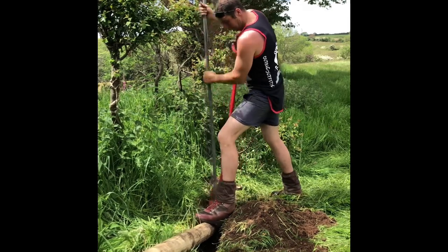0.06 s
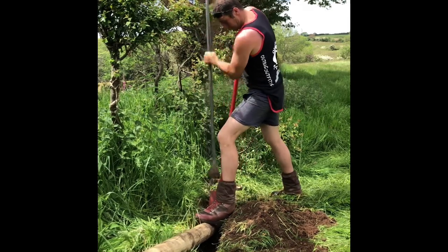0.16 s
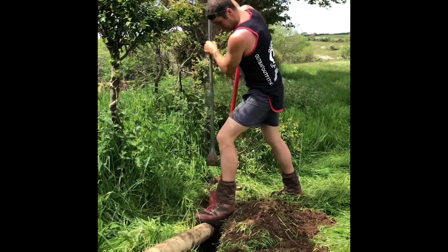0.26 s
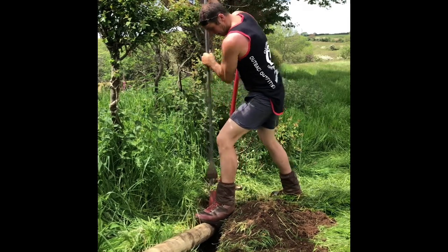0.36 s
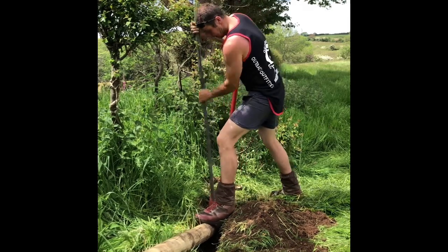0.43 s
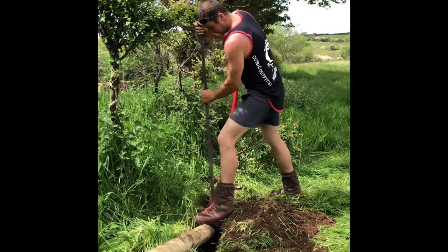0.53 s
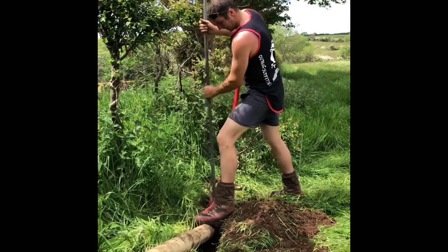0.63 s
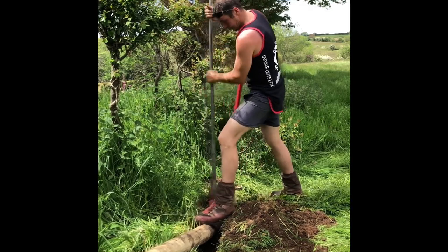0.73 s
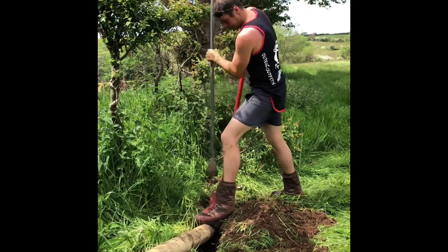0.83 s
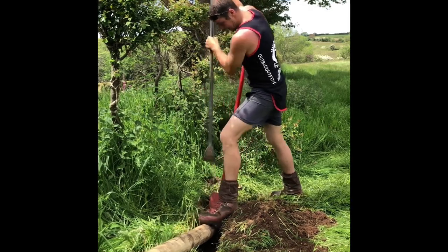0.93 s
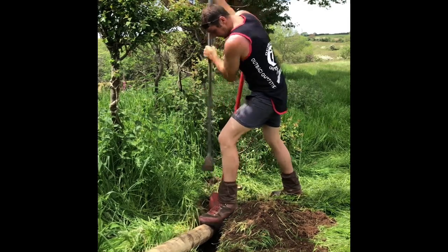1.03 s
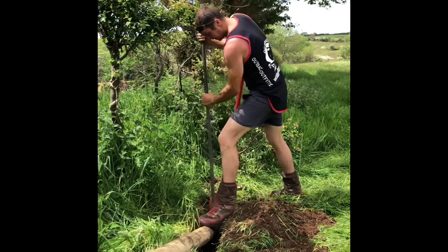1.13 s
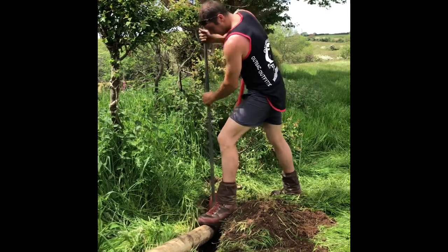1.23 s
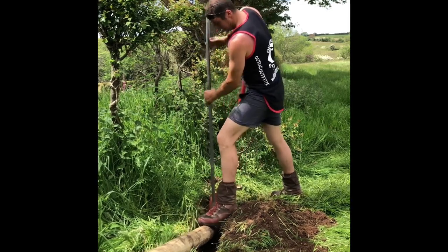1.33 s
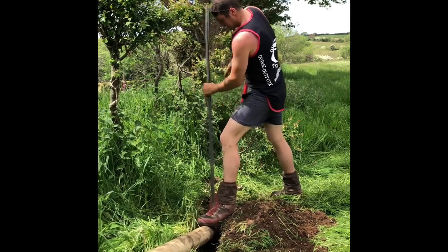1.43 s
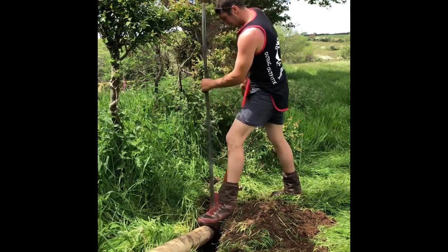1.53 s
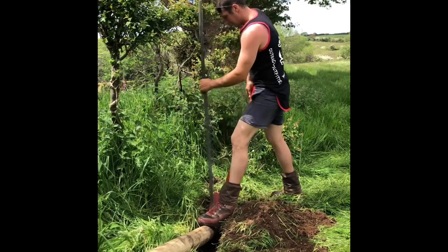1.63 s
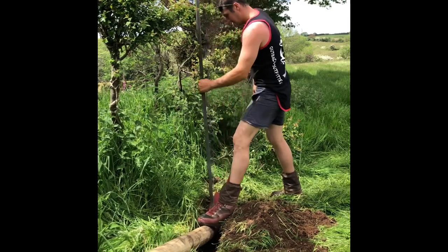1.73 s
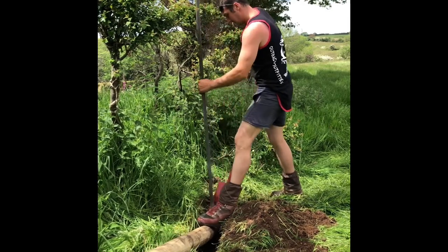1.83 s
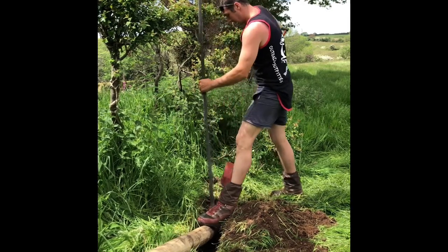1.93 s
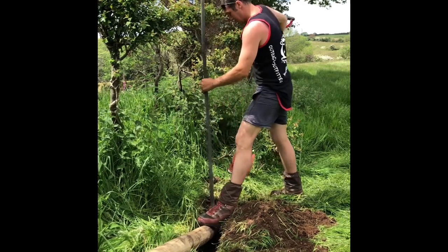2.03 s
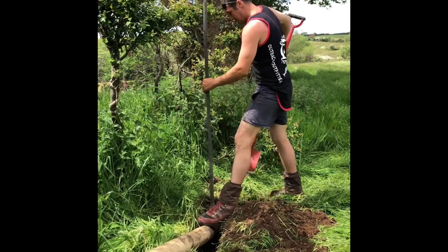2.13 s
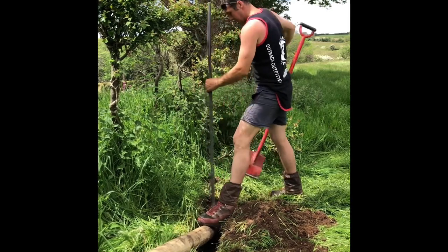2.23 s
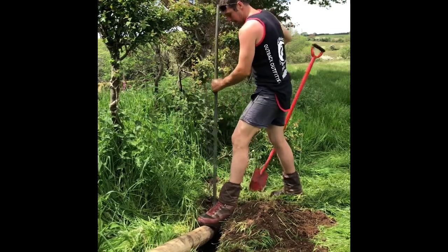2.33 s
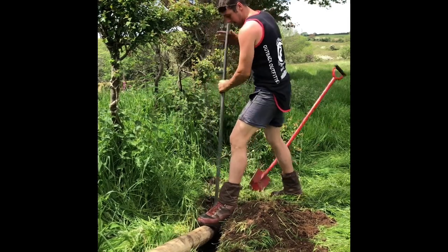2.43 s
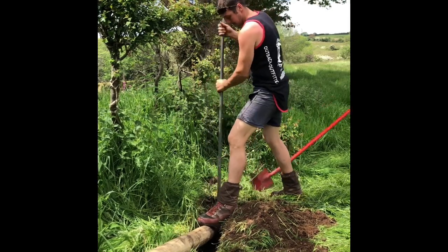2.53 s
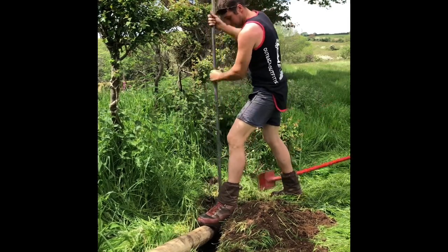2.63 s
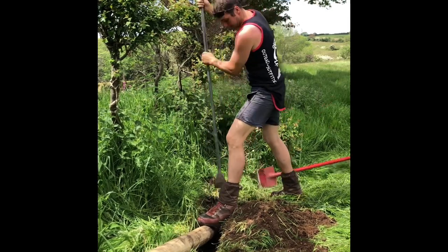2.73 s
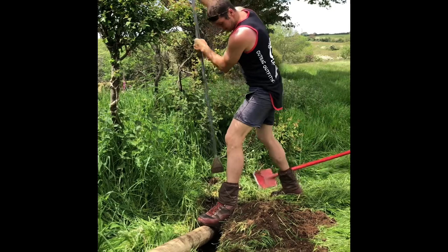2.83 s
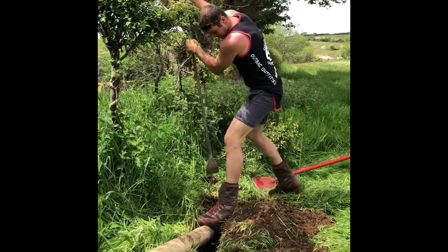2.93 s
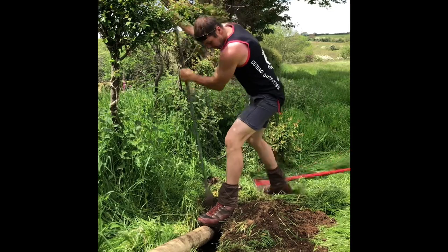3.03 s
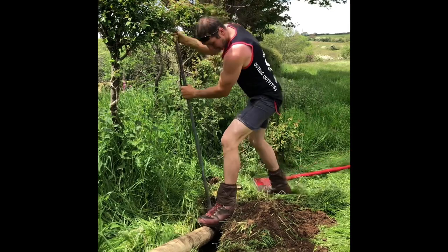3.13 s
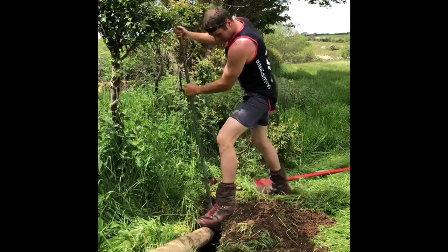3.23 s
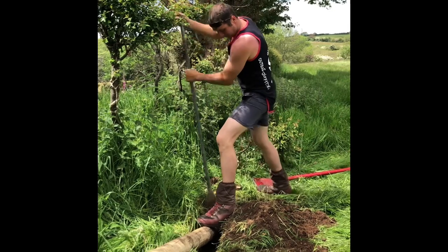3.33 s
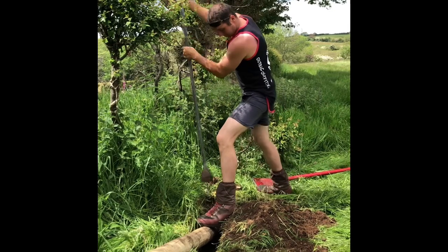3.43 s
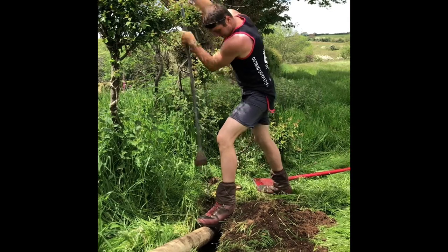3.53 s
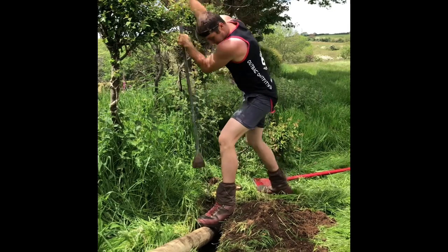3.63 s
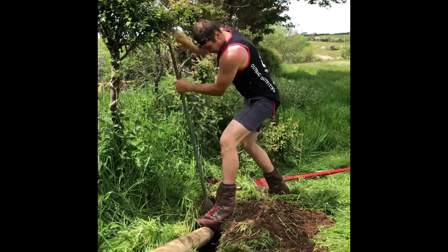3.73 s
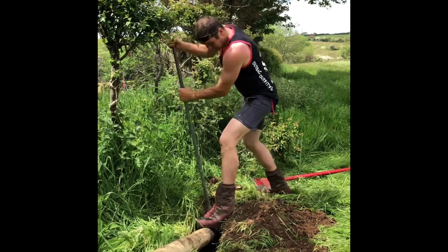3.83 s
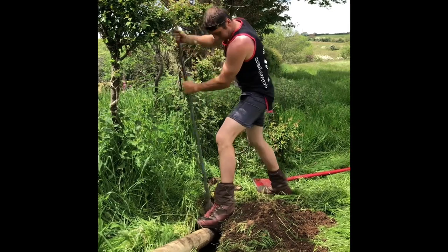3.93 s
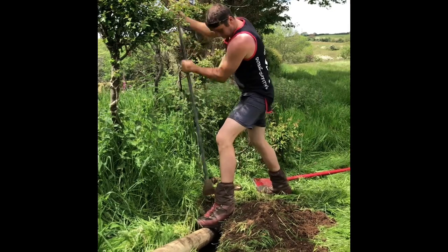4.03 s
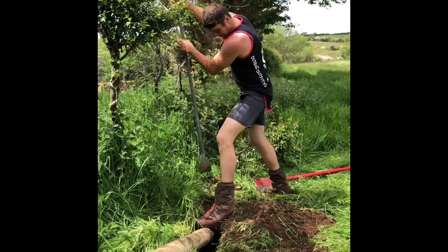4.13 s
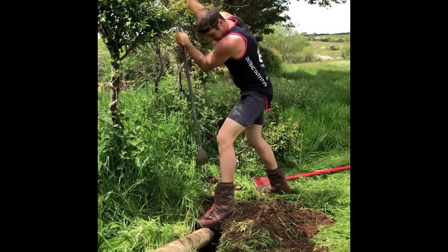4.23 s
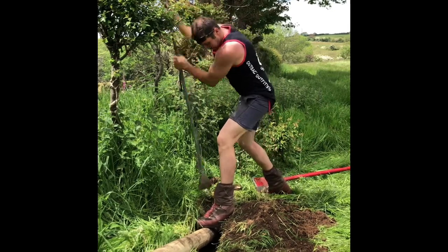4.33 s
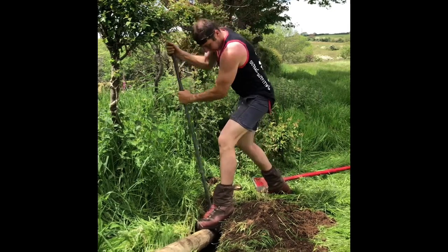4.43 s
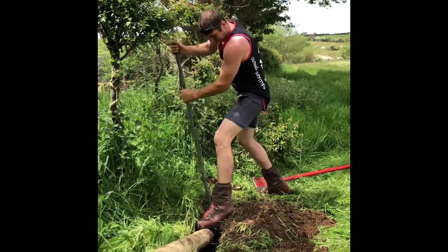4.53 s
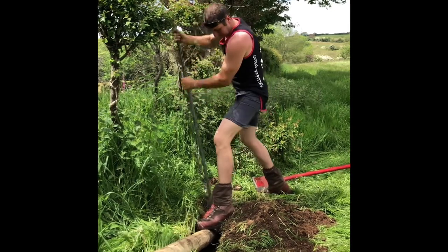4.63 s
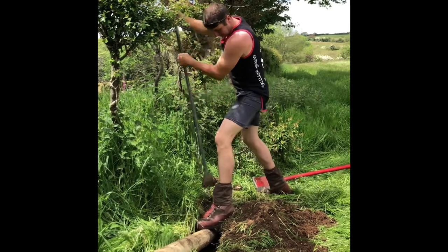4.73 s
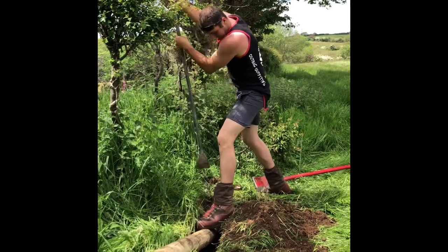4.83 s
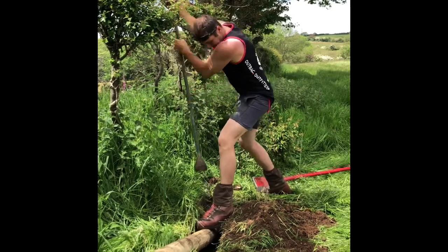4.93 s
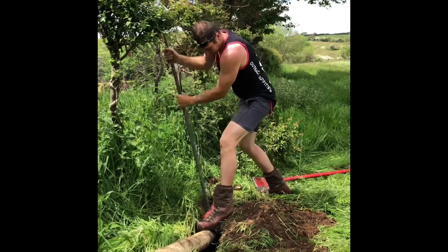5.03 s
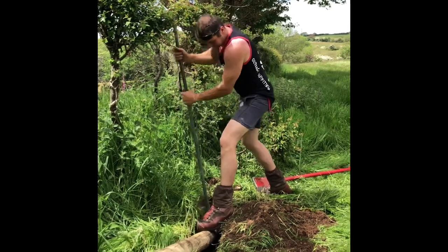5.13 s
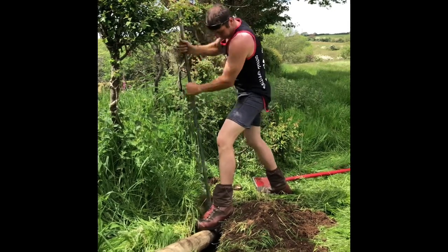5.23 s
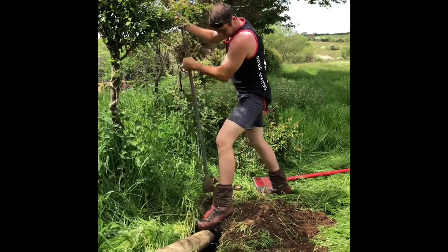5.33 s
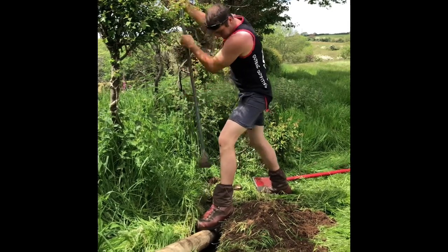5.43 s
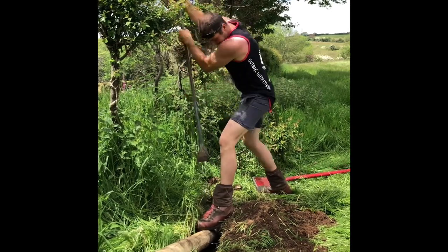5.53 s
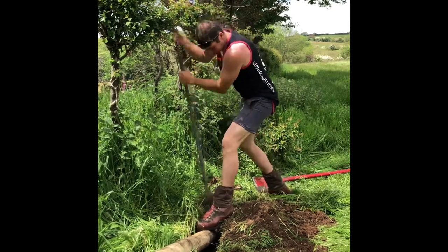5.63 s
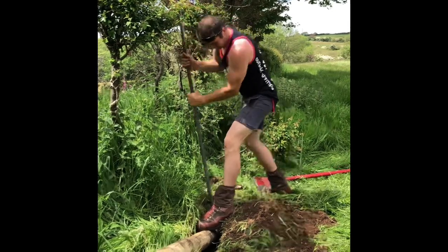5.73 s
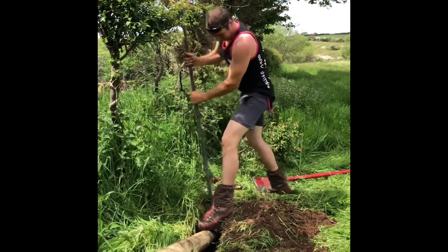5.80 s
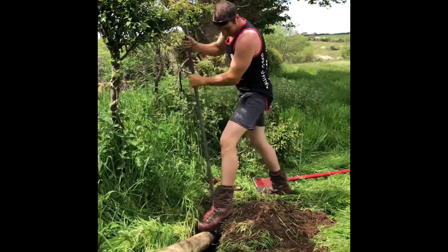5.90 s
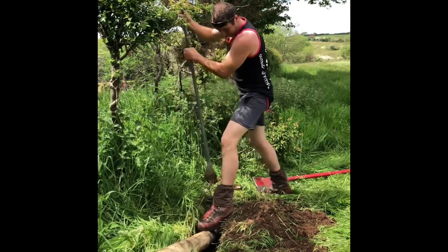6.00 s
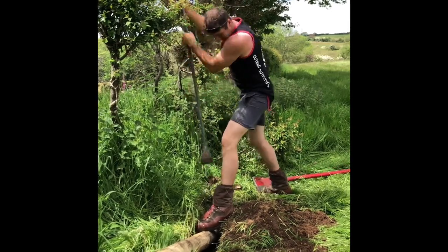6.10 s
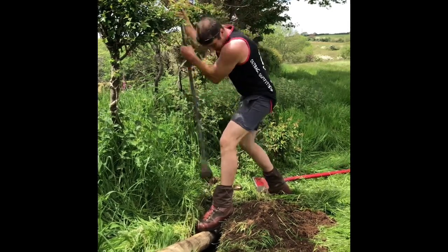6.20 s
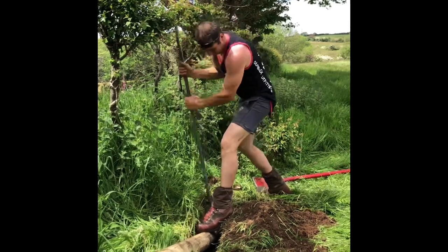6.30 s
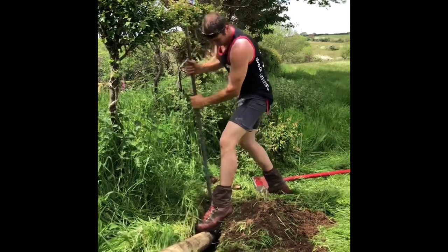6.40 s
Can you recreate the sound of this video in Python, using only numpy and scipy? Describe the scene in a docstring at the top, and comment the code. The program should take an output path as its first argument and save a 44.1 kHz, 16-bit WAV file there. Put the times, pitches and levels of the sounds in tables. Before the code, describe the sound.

Close, sharp knocks of a steel rammer on timber outdoors: two blows, a shovel's soft thud, then six more at a steady pace.

```python
"""A steel rammer bar, close to the microphone, strikes the foot of a wooden fence strut eight times.
Each blow cracks, sends a falling bending wave through the timber, thumps the ground and shakes soil
loose; the steel zings on the blow and tinkles as it is lifted. In the pause a shovel drops into the
grass. The place is a quiet paddock with a light breeze and an engine idling far off.
Heard in mono, through the nearby microphone's limiter, which squashes every blow."""
import sys
import numpy as np
from scipy import signal
from scipy.fft import rfft, irfft, next_fast_len
from scipy.io import wavfile
from scipy.ndimage import uniform_filter1d, minimum_filter1d, map_coordinates

SR = 44100
rng = np.random.default_rng(int(sys.argv[2]) if len(sys.argv) > 2 else 0)


def output_pcm(signal):
    """Save a mono or channel-first signal as 16-bit PCM at the path in sys.argv[1].

    Samples are clipped to [-1, 1] before scaling.
    """
    pcm = np.clip(np.atleast_2d(signal).T, -1, 1) * 32767
    wavfile.write(sys.argv[1], SR, np.round(pcm).astype(np.int16))


N = 284886
AGE = np.arange(SR // 2) / SR  # time since a contact [s]


def amp(db):
    """Decibels to gain."""
    return 10 ** (np.asarray(db) / 20)

def unit(x):
    """Scale to rms 1."""
    return x / np.sqrt(np.mean(x ** 2) + 1e-20)

def along(points, hz):
    """Read (frequency, value) points on a log axis."""
    f, v = np.transpose(points)
    return np.interp(np.log(hz + 1), np.log(f + 1), v)

def noise(spectrum, size=len(AGE)):
    """Coloured noise of rms 1."""
    m = next_fast_len(size)
    gain = amp(along(spectrum, np.fft.rfftfreq(m, 1 / SR)))
    return unit(irfft(rfft(rng.standard_normal(m)) * gain, m)[:size])

def crumbs(spectrum, clump_db):
    """Noise broken into millisecond grains."""
    grains = map_coordinates(rng.standard_normal(len(AGE)), [AGE * 900], order=1)
    return unit(noise(spectrum) * amp(clump_db * grains))

def resonance(hz, width_hz):
    """An unsteady ring: noise in one narrow band."""
    f = np.fft.rfftfreq(len(AGE), 1 / SR)
    return unit(irfft(rfft(rng.standard_normal(len(AGE))) / (1 + ((f - hz) / width_hz) ** 2), len(AGE)))

def tone(hz):
    """A sine that follows a pitch curve."""
    return np.sin(2 * np.pi * np.cumsum(hz) / SR)

def wobble(per_s):
    """A smooth random curve."""
    return map_coordinates(rng.standard_normal(N // 100), [np.arange(N) / SR * per_s])

def fade(delay, rise, t60):
    """Envelope that waits, rises and dies away; times in seconds."""
    t = np.maximum(AGE - delay, 0)
    return (1 - np.exp(-(t / rise) ** 2)) * 1000 ** (-t / t60)

def add(track, s, sound):
    """Mix a sound into the track at time s."""
    part = track[round(s * SR):][:len(sound)]
    part += sound[:len(part)]


# open-air rumble and leaf hush: (frequency [Hz], level [dB])
RUMBLE = [(12, -47), (25, -20), (40, -19), (60, -4.5), (92, -0.5), (120, -2), (160, -0.5), (216, -11),
          (290, -15.5), (400, -18.5), (520, -48.5), (880, -120)]
LEAVES = [(150, -27.5), (278, -21.5), (380, -17.5), (500, -15), (800, -12), (1500, -14.5), (2200, -16.5),
          (3120, -21), (3910, -20), (4730, -24), (16000, -45.5)]

def breeze():
    """A low rumble lies over the paddock, with a fluttering hush of leaves."""
    return amp(-53) * noise(RUMBLE, N) + amp(-57 + 1.2 * wobble(per_s=5)) * noise(LEAVES, N)


# course of the idle: (time [s], firing rate [1/s], clatter level [dB], hum level [dB])
IDLE = [(0, 27.626, -5.5, -10.5), (0.399, 27.854, -11, -18), (0.9, 29.06, -12, -23),
        (1.801, 27.95, -14, -23), (2.7, 27.61, -9.5, -15.5), (4.2, 26.95, -8.5, -16.5),
        (4.85, 26.96, -10, -6.5), (5.5, 27.4, -9.5, -8), (6.46, 27.78, -13, -20.5)]
# exhaust partials: (multiple of the firing rate, level [dB])
EXHAUST = [(1, -24), (2, 1), (3, 1), (4, -9.5), (5, -10), (5.5, -10), (6.5, -17.5), (7, -18.5)]
# engine clatter from afar: (frequency [Hz], level [dB])
CLATTER = [(600, -25), (1500, 0), (1900, 5.5), (2400, -0.5), (3100, -5), (3900, 1), (4800, -11.5),
           (5800, -13.5), (6900, -11.5), (8000, -25), (10000, -14.5), (12000, -35), (16000, -37)]

def distant_engine():
    """Far off, an engine idles: exhaust drone, a hum that comes and goes, clatter at every firing."""
    s, rate, clatter_db, hum_db = np.transpose(IDLE)
    t = np.arange(N) / SR
    firings = np.cumsum(np.interp(t, s, rate)) / SR
    drone = sum(amp(db + 4.5 * wobble(4.3)) * np.sin(2 * np.pi * (k * firings + rng.random()))
                for k, db in EXHAUST)
    hum = amp(np.interp(t, s, hum_db) + 1.86 * wobble(10)) * np.sin(2 * np.pi * 10 * firings)
    cycle = (firings + 0.08 * wobble(rate.mean())) % 1
    bursts = np.exp(-((cycle - 0.5) / 0.3) ** 2) * amp(2.5 * wobble(rate.mean()))
    clatter = unit(bursts * noise(CLATTER, N)) * amp(np.interp(t, s, clatter_db))
    # a narrow resonance in the clatter
    whine = unit(bursts * amp(2.5 * wobble(3.7)) * tone(2290 + 110 * wobble(200)))
    return amp(-51) * (drone + hum) + amp(-50) * clatter + amp(-69) * whine


# stalks underfoot: (time [s], level [dB])
STALK_TICKS = [(0.11, -54), (0.2628, -53), (1.603, -46)]
# one tick: (frequency [Hz], level [dB])
STALK = [(300, -17), (1000, 1), (2000, 3), (4500, -16), (8000, -27.5), (16000, -32.5)]

def stalks():
    """Stalks tick faintly underfoot."""
    out = np.zeros(N)
    for s, db in STALK_TICKS:
        add(out, s, amp(db) * crumbs(STALK, clump_db=4) * fade(0, 0.003, 0.25))
    return out


# brushed grass blades: (frequency [Hz], level [dB])
BLADES = [(300, -14.5), (700, 7.5), (1500, 1.5), (3000, -2.5), (6000, -19), (10000, -26), (16000, -25)]

def swing():
    """Ahead of each blow, grass rustles ever louder as the bar comes down through it."""
    out = np.zeros(N)
    lead = AGE[:round(0.4 * SR)]
    swell = np.exp((lead - lead[-1]) / 0.11)
    for s, *_, swing_db in BLOWS:
        rustle = crumbs(BLADES, clump_db=3)[:len(lead)] * swell
        add(out, s - lead[-1], amp(swing_db - 49.5) * rustle)
    return out


# gritty soil: (frequency [Hz], level [dB])
SOIL = [(200, 1), (700, 12), (1500, 8), (2500, -2), (4000, -3), (5500, -8.5), (8000, -10.5), (10000, -9.5),
        (12000, -18), (16000, -21)]

def lead_in():
    """A faint gritty rustle just before each blow."""
    return crumbs(SOIL, clump_db=4) * fade(0, 0.004, 0.19)


# the crack and its splintery top, close up: (frequency [Hz], level [dB])
CRACK = [(150, -20.5), (500, -1.5), (950, 7.5), (1400, 3.5), (2200, -4), (3700, -17), (6000, -14),
         (10000, -41.5), (16000, -34)]
SPLINTER = [(1000, -25), (3000, 11), (6000, 0.5), (10000, -0.5), (16000, -17.5)]

def impact(crack_db, bright_db):
    """Steel meets wood: a crack, a knock, a bending wave and a splintery edge."""
    crack = amp(crack_db - 4) * noise(CRACK) * fade(0, 0.0011, 0.045)
    knock = amp(-0.5) * np.sin(2 * np.pi * 935 * AGE) * fade(0, 0.0015, 0.031)
    wave = amp(6.5) * bending_wave(start_hz=1092, end_hz=215)
    splinter = amp(bright_db - 11.5) * crumbs(SPLINTER, clump_db=2.5) * fade(0.0049, 0.00075, 0.029)
    return crack + knock + wave + splinter

def bending_wave(start_hz, end_hz):
    """Short bending waves outrun long ones, so the pulse arrives as a brief falling chirp."""
    t = np.maximum(AGE - 0.00432, 0)
    glide_s = 0.00359 * rng.uniform(0.9, 1.117)
    hz = end_hz + (start_hz - end_hz) * np.exp(-(t / glide_s) ** 2)
    return tone(hz * (t > 0)) * (1 - np.exp(-(t / 0.0014) ** 2)) * np.exp(-(t / 0.0066) ** 2)


# modes of strut and bar in contact: (frequency [Hz], level [dB], t60 before choking [s])
STRUT_MODES = [(62, -16.5, 0.083), (100.3, -10, 0.36), (169.7, -15.5, 0.28), (217.8, 6.5, 0.14),
               (337.7, -10.5, 0.18), (358.2, -0.5, 0.16), (502.3, -2, 0.11), (544, -9.5, 0.15),
               (658, -14, 0.19), (690, -8.5, 0.15), (799, -16.5, 0.34), (960, -16, 0.25), (1060, -32, 0.36),
               (1137, -7.5, 0.028), (1264, -23.5, 0.081), (1481, -23.5, 0.41), (1965, -1.5, 0.036),
               (2527, -1, 0.023), (2672, 1, 0.021), (3030, -11, 0.033), (3470, -15, 0.023),
               (4090, -16, 0.012), (4390, -9, 0.024), (5270, -26.5, 0.038)]
# the strut's many weak, crowded modes: (frequency [Hz], level [dB])
CROWDED_MODES = [(150, -13), (300, -0.5), (450, 1.5), (950, 2.5), (1150, 0.5), (1550, -5.5), (2100, -15),
                 (3000, -21.5), (6000, -34.5), (16000, -58)]

def strut_ring(timber, crack_db, ring_db, bright_db, pitch):
    """The strut rings a little differently each time, until the bar's weight settles and chokes it."""
    hz, db, t60 = np.transpose(STRUT_MODES)[:, :, None]
    scatter, detune = rng.standard_normal((2, len(STRUT_MODES), 1))
    delay = 0.00465 * np.maximum(np.sqrt(1000 / hz) - 0.7, 0)  # low modes arrive last
    rise = 0.0011 + 1.44 / hz  # and swell slowest
    blow_db = np.where(hz > 1800, crack_db + 2, ring_db) + bright_db * (hz > 3200)
    level = amp(db - 4.5 + 1.5 * scatter + blow_db)
    sines = np.sin(2 * np.pi * hz * pitch * (1 + 0.008 * detune) * (AGE - delay))
    modes = np.sum(level * sines * fade(delay, rise, t60), axis=0)
    body = amp(ring_db - 19.5) * timber * fade(0.0095, 0.0038, 0.14)
    choke = np.exp(-(AGE / 0.1) ** 3)
    return (modes + body) * choke

def loose_soil():
    """Soil shakes loose, then the bar beds into the grit."""
    spill = amp(-22) * crumbs(SOIL, clump_db=-0.5) * fade(0.019, 0.0029, 0.17)
    grind = amp(-30) * crumbs(SOIL, clump_db=3) * fade(0.051, 0.0016, 0.14)
    return spill + grind

def thump(start_hz, end_hz, delay, rise, t60):
    """Soft earth gives way under a weight, its pitch sagging."""
    t = np.maximum(AGE - delay, 0)
    hz = end_hz + (start_hz - end_hz) * np.exp(-t / 0.012)
    return tone(hz * (t > 0)) * fade(delay, rise, t60)


# bright hiss of the steel's tick and of swishing grass: (frequency [Hz], level [dB])
HISS = [(300, 4.5), (1500, -19.5), (3500, -4.5), (5000, -3), (10000, -5), (16000, -10.5)]

def jingle(t60, tick_db):
    """A rough, high sizzle of steel and a tiny tick, a little different at every touch."""
    ring = resonance(10630, width_hz=45) + amp(-3) * resonance(10760, width_hz=130)
    chatter = amp(3 * map_coordinates(rng.standard_normal(len(AGE)), [AGE * 120], order=1))
    tick = amp(tick_db) * crumbs(HISS, clump_db=0) * fade(0, 0.0005, 0.02)
    return unit(ring * chatter) * fade(0, 0.005, t60) + tick

def steel_zing():
    """The struck steel jingles, then sings on faintly."""
    shimmer = amp(-26) * resonance(10660, width_hz=70) * fade(0, 0.01, 0.9)
    return jingle(t60=0.19, tick_db=-10.5) + shimmer


# the bar's rebounds: (time after the blow [s], level [dB])
REBOUNDS = [(0.0255, -19), (0.052, -22), (0.107, -35.5)]
# one dull bump: (frequency [Hz], level [dB])
BUMP = [(200, -6), (420, 5), (600, 5), (900, -6), (1500, -12.5), (4000, -21), (12000, -38)]

def add_rebounds(track, s, rebound_db):
    """The bar chatters on the timber after the blow at time s."""
    for after, db in REBOUNDS:
        bump = crumbs(BUMP, clump_db=2.5) * fade(0, 0.00091, 0.09)
        add(track, s + after * rng.uniform(0.94, 1.06), amp(db + rebound_db) * bump)


# the blows, levels relative: (time [s], crack [dB], wood ring [dB], ground thump [dB], brightness [dB],
# steel zing [dB], pitch [ratio], soil [dB], rebound [dB], lead-in [dB], swing rustle [dB])
BLOWS = [(0.4746, -1, -2, 2, 2, -1.5, 0.97, 1, -2.5, -1, 0),
         (1.1602, 1, -2, 2, 0.5, -15.5, 1.0, 0.5, 0.5, -1.5, -35),
         (3.1005, -2.5, -2.5, 2.5, -0.5, -21, 1.01, -1, -3.5, -8, 8.5),
         (3.7855, -2, -4, 5, 1.5, -0.5, 1.01, 1, -4, -7.5, 5.5),
         (4.4241, -1.5, 0, 3, 0, 0.5, 0.99, 0, -3.5, 1, -18),
         (5.0682, -1, -1, 4.5, 0.5, -0.5, 1.0, -0.5, 0.5, -1, -7.5),
         (5.7011, -1, 0.5, 1, -5, 7.5, 0.995, -0.5, 0, 0, -10),
         (6.313, 0.5, 1.5, 4, -3.5, 6.5, 0.99, -1.5, -0.5, -5, 0.5)]

def rammer():
    """Near the microphone the bar is driven at the strut, shaking timber, ground and steel."""
    out = np.zeros(N)
    timber = noise(CROWDED_MODES)  # the same timber answers every blow
    for (s, crack_db, ring_db, thump_db, bright_db,
         zing_db, pitch, soil_db, rebound_db, lead_in_db, _) in BLOWS:
        add(out, s - 0.024, amp(lead_in_db - 40.5) * lead_in())
        add(out, s, impact(crack_db, bright_db))
        add(out, s, strut_ring(timber, crack_db, ring_db, bright_db, pitch))
        add(out, s, amp(soil_db) * loose_soil())
        add(out, s, amp(thump_db - 5) * thump(117, 66, delay=0.021, rise=0.0057, t60=0.079))
        add_rebounds(out, s, rebound_db)
        add(out, s + 0.024, amp(zing_db - 40) * steel_zing())
    return out

def boot_nudge():
    """A boot shifts on the strut, which gives a low note."""
    out = np.zeros(N)
    add(out, 1.003, amp(-43.5) * resonance(218, width_hz=29) * fade(0, 0.008, 0.25))
    return out


# touches of loose steel: (time [s], level [dB])
TINKLES = [(1.26, -60), (1.384, -68), (3.966, -61), (4.0153, -53), (4.054, -61), (4.62, -68.5),
           (4.676, -62), (5.27, -67.5), (5.3268, -57.5), (5.9477, -62), (6.0288, -62.5)]

def tinkles():
    """A loose bit of steel tinkles as the bar is lifted."""
    out = np.zeros(N)
    for s, db in TINKLES:
        add(out, s, amp(db) * jingle(t60=0.23, tick_db=3))
    return out


# the shovel's contacts: (time [s], swish level [dB], thud level [dB], swish time constant [s])
SHOVEL_FALL = [(2.392, -46, -30, 0.012), (2.53, -68, -50, 0.046), (2.705, -44, -16, 0.015)]
# bumped turf: (frequency [Hz], level [dB])
TURF = [(50, -7), (130, 3), (250, -6), (700, -24), (1200, -41), (4000, -64)]

def shovel():
    """Grass swishes as the shovel drops through it and bumps the turf."""
    out = np.zeros(N)
    for s, swish_db, thud_db, swish_s in SHOVEL_FALL:
        swell = np.exp(-np.abs(AGE - AGE.mean()) / swish_s)
        add(out, s - AGE.mean(), amp(swish_db) * crumbs(HISS, clump_db=0) * swell)
        add(out, s, amp(thud_db) * thump(345, 78.1, delay=0.0015, rise=0.019, t60=0.098))
        add(out, s - 0.008, amp(thud_db - 10) * crumbs(TURF, clump_db=3) * fade(0, 0.00903, 0.093))
    return out

def sliding_tone():
    """Late on, one faint tone slides down."""
    out = np.zeros(N)
    hz = 450 * np.exp(-AGE / 0.49)
    add(out, 5.855, amp(-45) * tone(hz) * np.exp(-((AGE - 0.045) / 0.025) ** 2))
    return out


# decay of the paddock's echo: (frequency [Hz], t60 [s])
HEDGE_DECAY = [(100, 0.47), (500, 0.53), (2000, 0.41), (6000, 0.2), (14000, 0.073)]

def hedge_echo(x, delay):
    """Trees and hedge scatter a smooth tail back to the microphone."""
    hz, t, white = signal.stft(rng.standard_normal(len(AGE)), SR, nperseg=256)
    decay = 1000 ** (-t / along(HEDGE_DECAY, hz)[:, None])
    _, tail = signal.istft(white * decay, SR, nperseg=256)
    out = np.zeros(N)
    add(out, delay, signal.fftconvolve(x, tail / np.linalg.norm(tail)))
    return out

def scene():
    """The work close by and the paddock behind it, at one microphone."""
    work = swing() + rammer() + tinkles() + shovel() + boot_nudge() + stalks() + sliding_tone()
    paddock = breeze() + distant_engine()
    return (work + amp(-35) * hedge_echo(work, delay=0.053) + paddock)[None]

def limiter(x, ceiling_db, hold_s, release_s):
    """Gain ducks at once under a peak, holds, then recovers."""
    over_db = np.maximum(20 * np.log10(np.abs(x) + 1e-9) - ceiling_db, 1e-6)
    span = int(hold_s * SR) | 1
    held = -minimum_filter1d(-over_db, span, origin=span // 2)
    clock = np.arange(N) / SR / release_s
    duck_db = np.exp(np.maximum.accumulate(np.log(held) + clock) - clock)  # exponential release
    return x * amp(-uniform_filter1d(duck_db, size=30))

def record(dry):
    """The microphone's chain: limiter, softly rounded peaks and a band limit."""
    limited = limiter(dry[0], ceiling_db=-0.5, hold_s=0.0043, release_s=0.025)
    rounded = 0.93 * limited / (1 + np.abs(limited) ** 6) ** (1 / 6)
    m = next_fast_len(N + SR // 2)
    passband = np.fft.rfftfreq(m, 1 / SR) < 16200
    return irfft(rfft(rounded, m) * passband, m)[None, :N]


dry = scene()
out = record(dry)
output_pcm(out)
```